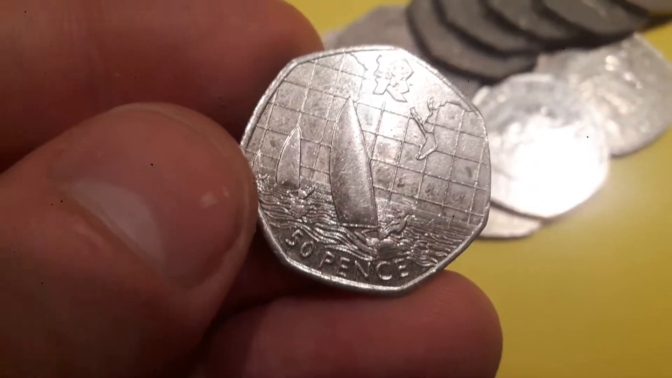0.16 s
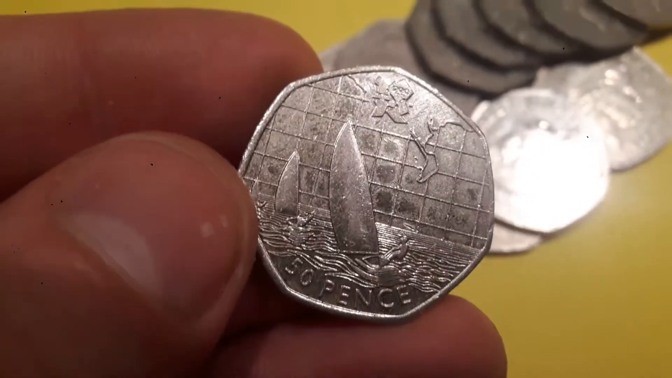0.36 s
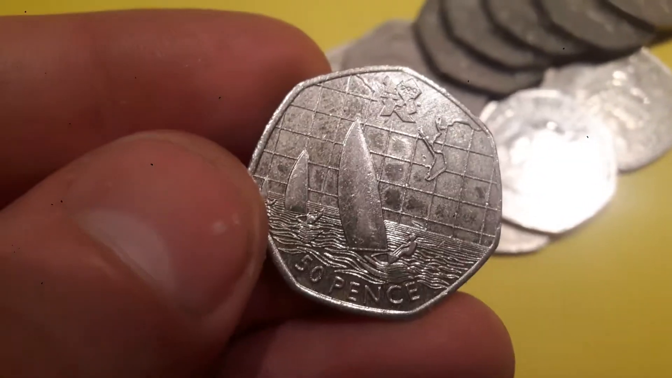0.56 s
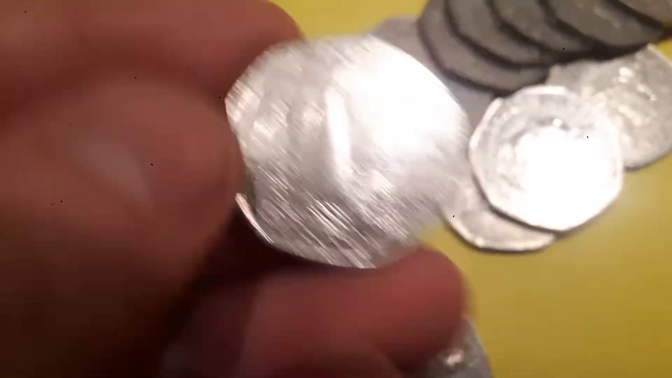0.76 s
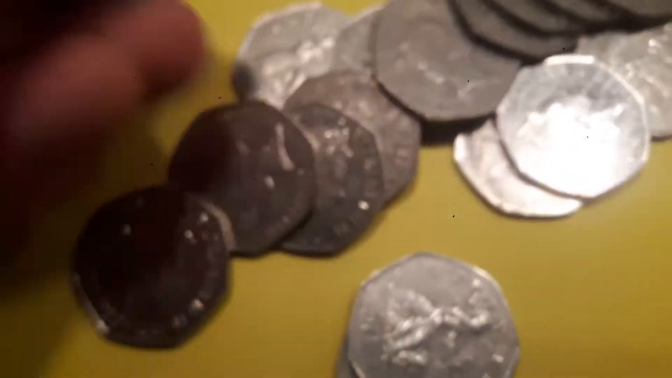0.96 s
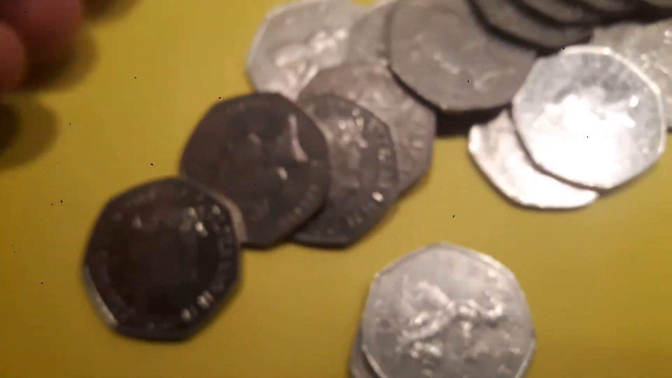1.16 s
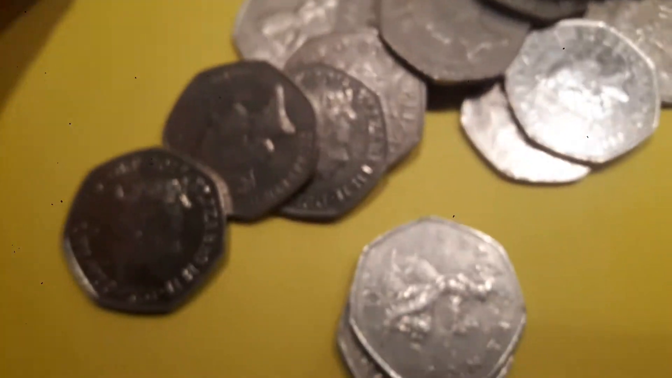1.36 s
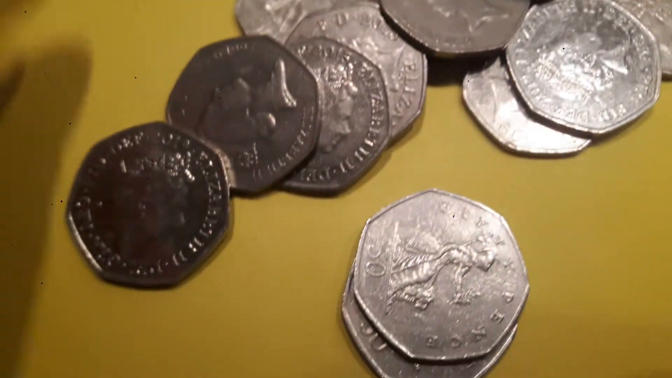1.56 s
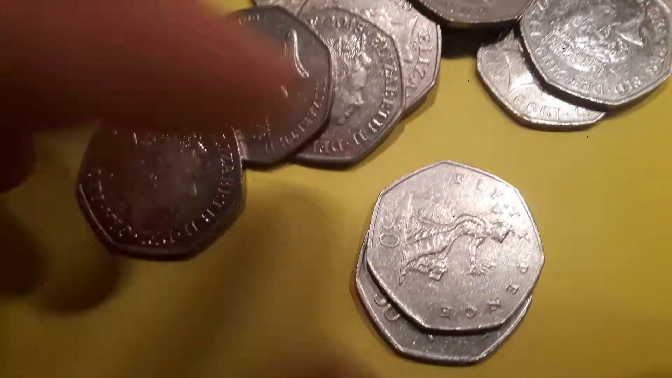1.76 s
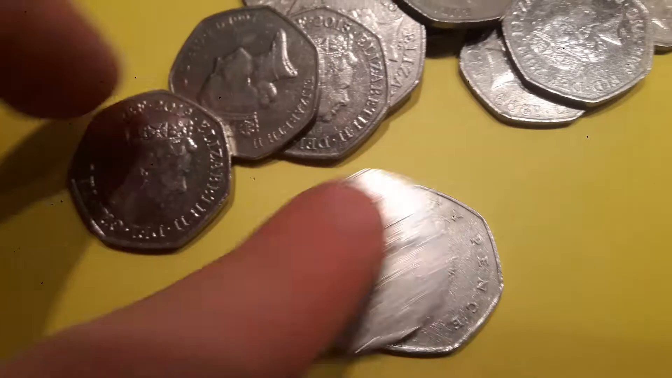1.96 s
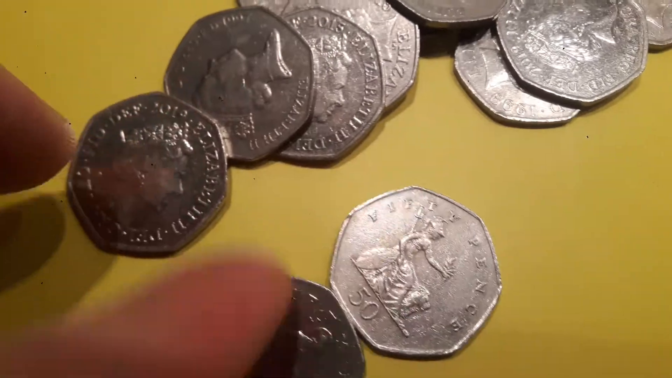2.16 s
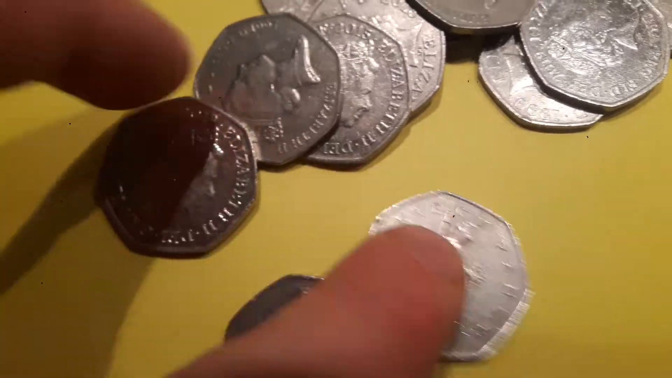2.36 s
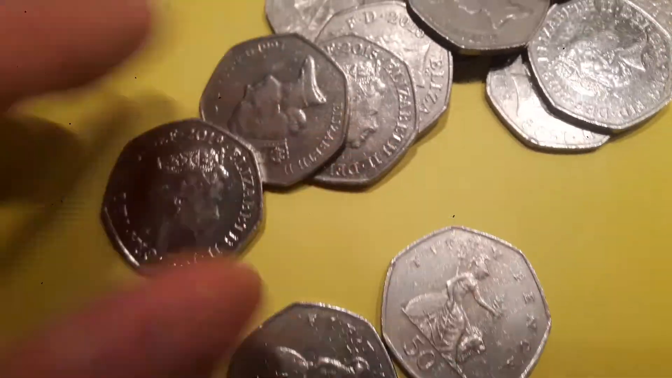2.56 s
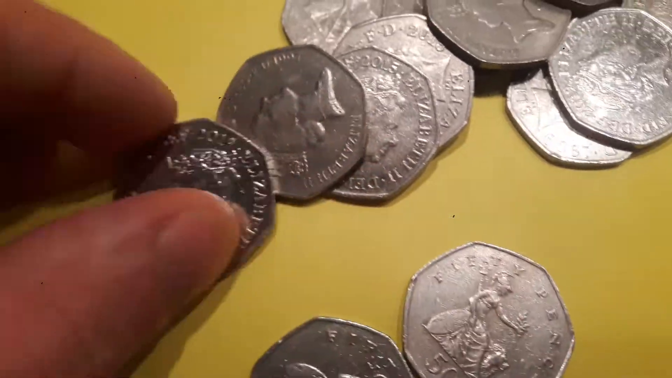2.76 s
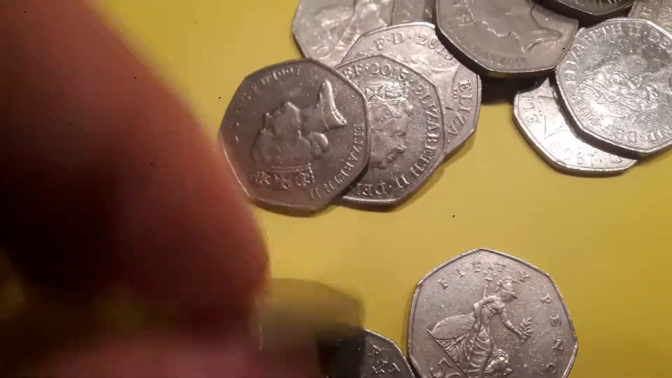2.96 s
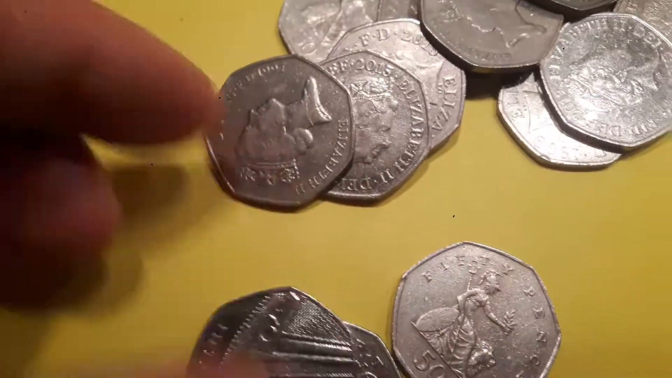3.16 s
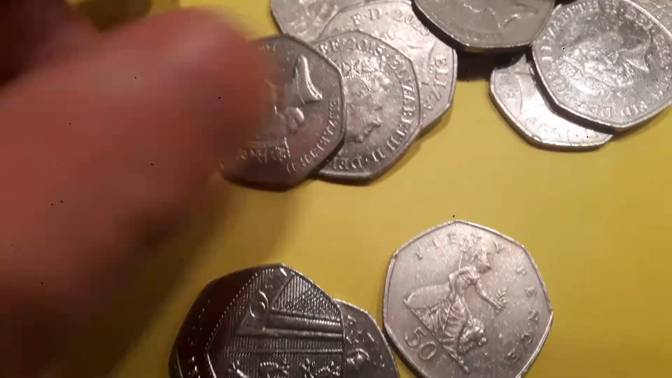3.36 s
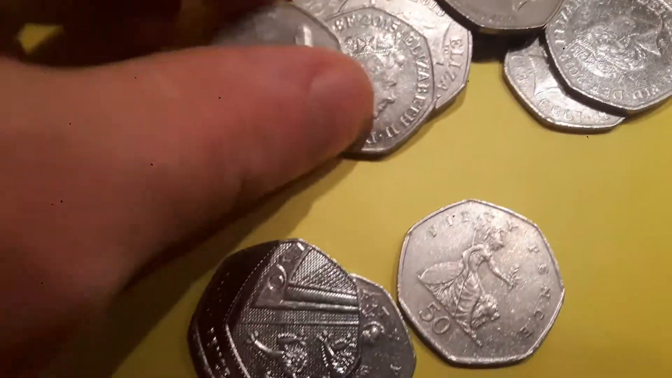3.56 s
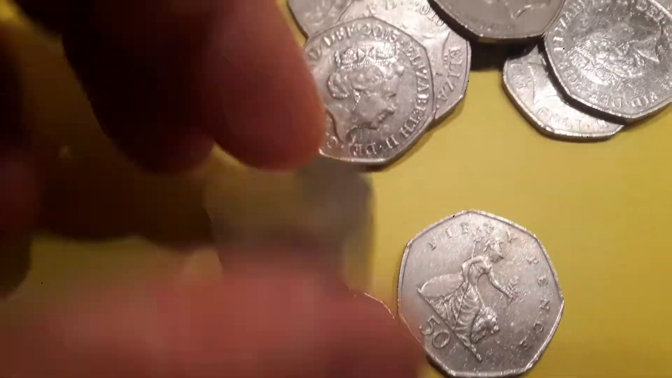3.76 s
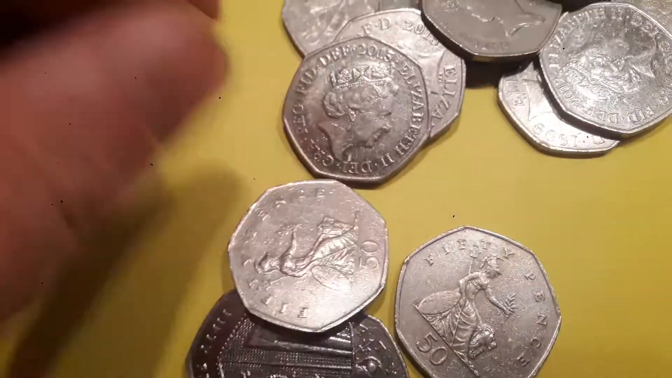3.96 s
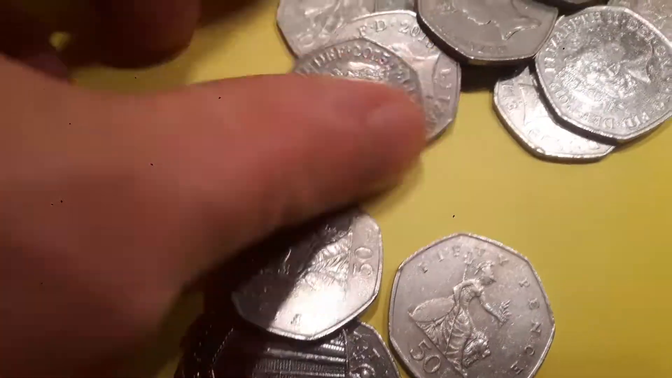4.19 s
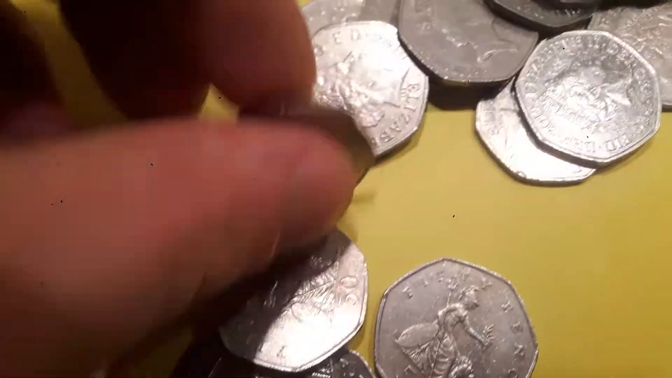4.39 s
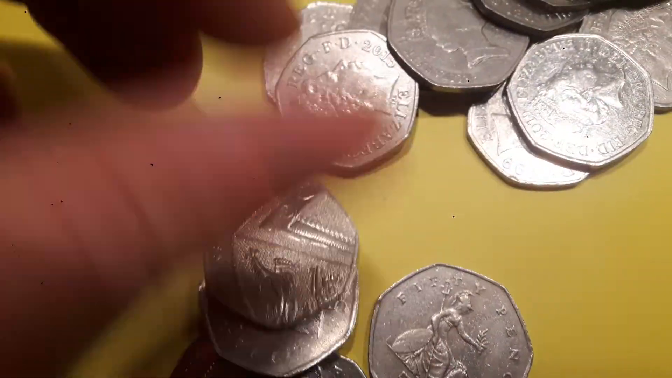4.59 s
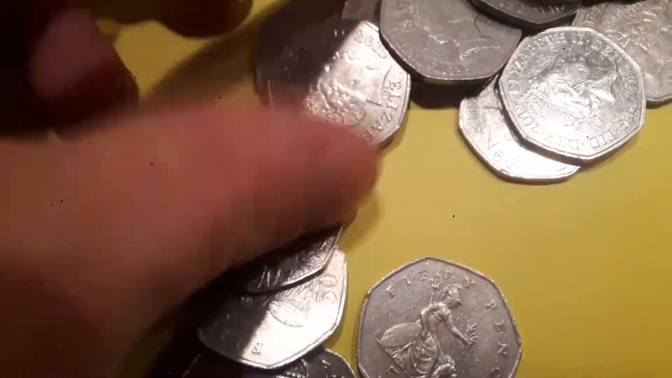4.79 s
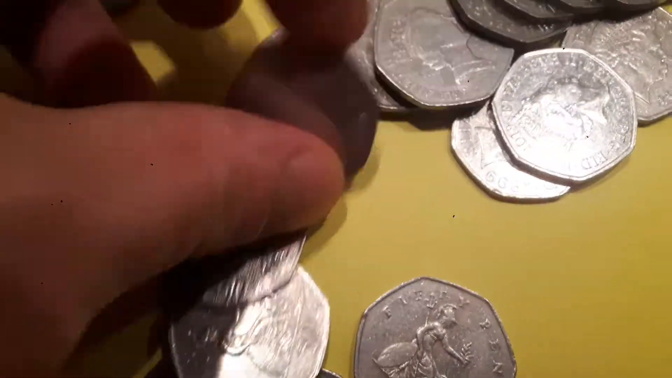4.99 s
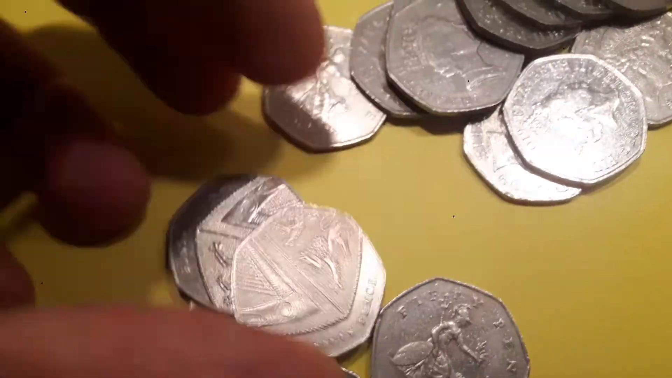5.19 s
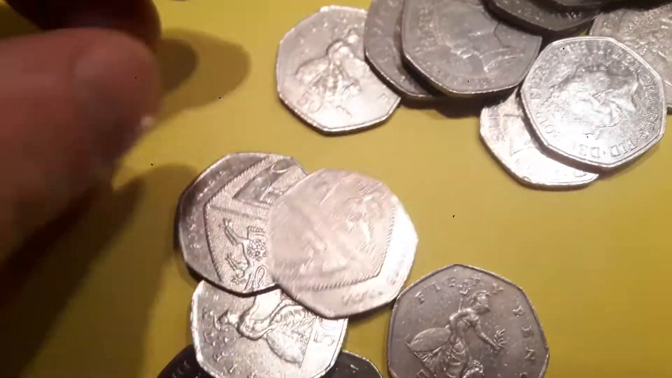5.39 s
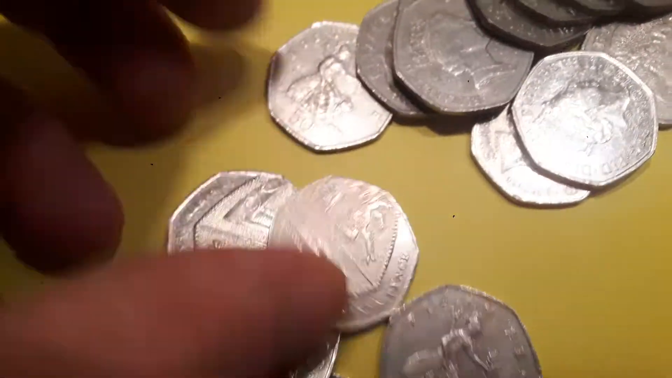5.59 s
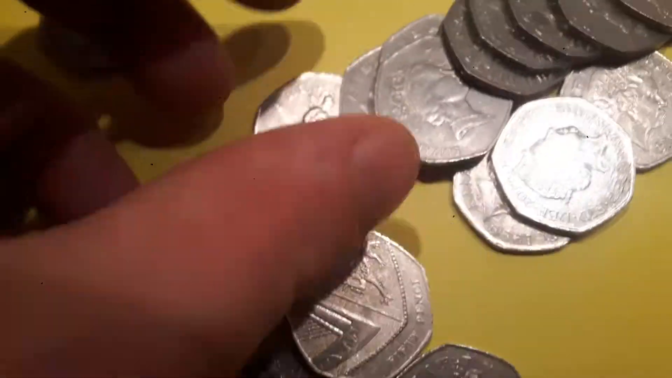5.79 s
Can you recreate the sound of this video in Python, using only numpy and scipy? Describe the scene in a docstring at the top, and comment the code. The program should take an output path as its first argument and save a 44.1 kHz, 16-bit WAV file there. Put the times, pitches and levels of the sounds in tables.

```python
"""A steady hiss and the faint rumble of fingers come first, then thuds on a wooden table and a low, hollow hum.
Coins are picked up and dropped on one another close to a small microphone: they tick, ring and slide.
Coins and wood are banks of decaying modes set off by blows and by showers of tiny collisions.
Fingers and dragged coins are shaped noise; a camera's focus motor buzzes as bursts of resonating clicks.
A quiet room adds a short tail to the coins and the table."""
import sys
import numpy as np
from scipy import signal
from scipy.fft import rfft, irfft
from scipy.io import wavfile

SR = 44100
rng = np.random.default_rng(int(sys.argv[2]) if len(sys.argv) > 2 else 0)


def invert_db(x):
    """Field ratio 10**(x/20) for x, a level in decibels (scalar or array-like)."""
    u = np.asarray(x, float) / 20
    return 10 ** u


def digitize_waveform(pressure):
    """Quantize a signal to 16-bit integers and store it at the path in sys.argv[1].

    Rows of a 2-D input are taken as channels; values are limited to [-1, 1].
    """
    field = np.atleast_2d(pressure).T
    bounded = np.clip(field, -1, 1)
    quanta = np.round(bounded * 32767).astype(np.int16)
    wavfile.write(sys.argv[1], SR, quanta)


N = 257544  # samples


def rms_one(x):
    """Normalisation: equal mean power, rms 1."""
    return x / np.sqrt(np.mean(x ** 2) + 1e-20)


def butter(x, order, hz, kind):
    """Butterworth filtering: a maximally flat passband."""
    return signal.sosfilt(signal.butter(order, hz, kind, fs=SR, output="sos"), x)


def drift(corner_hz):
    """Low-passed random fluctuation of rms 1, drawn 400 times a second and joined by straight lines."""
    draws = rng.standard_normal(int(N / SR * 400) + 2)
    memory = np.exp(-2 * np.pi * corner_hz / 400)
    slow = rms_one(signal.lfilter([1], [1, -memory], draws))
    return np.interp(np.arange(N) / SR * 400, np.arange(len(slow)), slow)


def coloured(spectrum):
    """Spectral shaping: white noise weighted along log frequency, rms 1."""
    hz, db = np.transpose(spectrum)
    grid = np.fft.rfftfreq(N, 1 / SR) + 1  # the added 1 Hz avoids log 0
    weight = invert_db(np.interp(np.log(grid), np.log(hz), db))
    return rms_one(irfft(rfft(rng.standard_normal(N)) * weight, N))


def strike(times, db, modes, spread_db, grains, tune):
    """Modal superposition: each blow excites every decaying mode with its own strength and phase."""
    at, out = (np.asarray(times) * SR).astype(int), np.zeros(N)
    luck = rng.standard_normal((len(at), len(modes)))
    phase = np.exp(2j * np.pi * rng.random((len(at), len(modes))))
    clock = np.cumsum(tune * np.ones(N)) / SR  # tune bends all pitches in time
    for k, (hz, level_db, t60) in enumerate(modes):
        # the same grains reach each mode three samples after the one before
        blows = np.roll(grains, 3 * k) + np.full(N, 1e-18 + 0j)
        np.add.at(blows, at, invert_db(db + spread_db * luck[:, k]) * phase[:, k])
        envelope = signal.lfilter([invert_db(level_db)], [1, -invert_db(-60 / (t60 * SR))], blows)
        out += np.real(envelope * np.exp(2j * np.pi * hz * clock))
    return out


def grit(per_s, spread_db, clump_db):
    """Clustered random impacts: tiny uneven collisions of random phase, rms 1; clumping varies their rate."""
    born = rng.random(N) < per_s * invert_db(clump_db * drift(40)) / SR
    sizes = invert_db(spread_db * np.minimum(rng.exponential(1, N), 4))
    impacts = born * sizes * np.exp(2j * np.pi * rng.random(N))
    return impacts / np.sqrt(np.mean(np.abs(impacts) ** 2))


def bursts(times, db, t60):
    """Exponential decay: a gain that rises with a 0.7 ms time constant at each moment and dies away."""
    jumps = np.full(N, 1e-18)
    np.add.at(jumps, (np.asarray(times) * SR).astype(int), invert_db(db))
    rise = np.exp(-1 / (0.0007 * SR))
    poles = np.convolve([1, -rise], [1, -invert_db(-60 / (t60 * SR))])
    return signal.lfilter([1 - rise], poles, jumps)


def swells(rows, rise, fall):
    """Exponential onset and decay (dB/s): full gain from a row's start for its length; one curve a level column."""
    t, out = np.arange(N) / SR, 0
    for start, length, *db in rows:
        shape = np.minimum(0, np.minimum(rise * (t - start), fall * (start + length - t)))
        out = out + invert_db(np.array(db))[:, None] * invert_db(np.maximum(shape, -200))
    return out


# Spectrum of room and microphone noise. Each row: frequency in Hz, relative level in dB per Hz.
HISS_SPECTRUM = [(15, -41), (25, 3), (33, -22.5), (65, 0), (259, -5), (538, -9.5), (584, -11), (787, -13),
                 (1470, -15.5), (1730, -20), (2040, -17.5), (2820, -19), (4360, -28), (15200, -34.5),
                 (16500, -33)]


def hiss():
    """Stationary noise: the steady floor of room and microphone, at -66.5 dB rms."""
    return invert_db(-66.5) * coloured(HISS_SPECTRUM)


def room(x):
    """Reverberation: convolution with exponentially decaying noise, duller than the direct sound."""
    t = np.arange(int(.4 * SR)) / SR
    t60_s, build_up_s = .3, 0.014
    tail = rng.standard_normal(len(t)) * invert_db(-60 * t / t60_s) * np.clip(t / build_up_s, 0, 1)
    tail = signal.lfilter([1], [1, -.7], tail)  # dulls the tail
    return signal.fftconvolve(x, tail / np.sqrt(np.sum(tail ** 2)))[:N]


# A low hollow hum, twice, perhaps a phone's vibration motor.
# Each row: start in seconds, length in seconds, level in dB.
HUMS = [(0.885, 0.062, -49), (1.05, 0.015, -51)]


def hum():
    """Frequency and amplitude modulation: a low sine near 224.5 Hz that wavers in pitch and level."""
    level, = swells(HUMS, rise=1500., fall=207)
    hz = 224.5 * invert_db(0.034 * drift(12.))
    tone = np.sqrt(2) * np.sin(2 * np.pi * np.cumsum(hz) / SR)  # rms 1
    return level * invert_db(1.8 * drift(25.)) * tone


# Moments of the motor steps within a burst. Each entry: a count of step periods from the burst's start.
FOCUS_STEPS = [0, 2, 4, 5, 7, 9]
# Resonances of the camera shell. Each row: frequency in Hz, relative level in dB, t60 in seconds.
SHELL_MODES = [(253, -7.5, 0.0083), (1660, 1.5, 0.0012), (2630, -9.5, 0.0096), (3930, -45, 0.0014),
               (5850, -13, 0.0012)]


def focus_motor():
    """Source and resonator: motor steps of changing direction click into the modes of the camera shell."""
    start_s, burst_period_s, step_s, burst_count = 1.4104, 1 / 30, 1 / 1047, 11
    click_db, end_bursts_db = -42.5, -7.5  # the first and last bursts are weaker
    clicks, out = np.full(N, 1e-18), np.zeros(N)
    for k in range(burst_count):
        db = click_db + end_bursts_db * (k in (0, burst_count - 1))
        at = (start_s + k * burst_period_s + step_s * np.array(FOCUS_STEPS)) * SR
        clicks[at.astype(int)] = invert_db(db) * np.array([1, -1, 1, 1, -1, 1])
    for hz, level_db, t60 in SHELL_MODES:
        r, w = invert_db(-60 / (t60 * SR)), 2 * np.pi * hz / SR
        out += signal.lfilter([0, invert_db(level_db) * np.sin(w)], [1, -2 * r * np.cos(w), r * r], clicks)
    out = butter(out, 2, [4600., 5300.], "bandstop")  # a gap between shell resonances
    return butter(out, 8, 7600., "low")  # the shell passes almost nothing of the top octave


# Fingers moving on the table; the longest row is the resting hand.
# Each row: start in seconds, length in seconds, rumble level in dB, rub level in dB, both before wavering.
FINGER_MOVES = [(0, 0.89, -71.5, -79), (1.0, 4.5, -68, -74.5), (1.44, 0.036, -50.5, -58),
                (1.97, .17, -73, -63), (2.49, 0.0033, -51, -74), (2.79, 0.0068, -54.5, -73),
                (3.19, 0.04, -46, -58), (3.3, 0.14, -74.5, -89.5), (3.64, 0.046, -59.5, -71),
                (3.76, 0.034, -55.5, -87.5), (3.89, 0.051, -49, -55.5), (4.0, 0.017, -70.5, -78),
                (4.31, 0.033, -50.5, -63), (4.63, 0.018, -41, -55), (4.75, .1, -63.5, -75),
                (4.9, 0.058, -56.5, -60.5), (5.1, 0.19, -56, -72.5), (5.29, 0.034, -49.5, -53),
                (5.71, 0.059, -55, -67.5)]
# Spectrum of the rumble. Each row: frequency in Hz, relative level in dB per Hz.
RUMBLE_SPECTRUM = [(25, -45.5), (85, 3), (125, 1), (180, 2.5), (260, -14.5), (350, -15), (430, -15),
                   (1200, -36.5), (2500, -58)]
# Spectrum of the rub. Each row: frequency in Hz, relative level in dB per Hz.
RUB_SPECTRUM = [(300, -3), (600, 3.5), (1100, -3), (2200, -9), (4000, -13.5), (8000, -46)]


def fingers():
    """Friction noise: moving fingers give a deep rumble and a brighter rub; also returns the rub's gain."""
    rumble, rub = swells(FINGER_MOVES, rise=414.5, fall=203.5)
    deep = rumble * invert_db(3.44 * drift(11.0)) * coloured(RUMBLE_SPECTRUM)
    skin = rub * invert_db(4.9 * drift(5.0)) * coloured(RUB_SPECTRUM)
    return deep + skin, rub


# Coins dragged over the table. Each row: start in seconds, length in seconds, level in dB.
DRAGS = [(1.44, .06, -49.5), (2.0, 0.073, -54.5), (4.3, 0.068, -55.5), (4.92, 0.062, -56), (5.2, 0.13, -53)]


def drone():
    """Resonance under friction: dragged coins make one wood mode drone, a narrow band of noise."""
    centre_hz, width_hz = 368.3, 28.6
    edges = [centre_hz - width_hz / 2, centre_hz + width_hz / 2]
    band = rms_one(butter(rng.standard_normal(N), 2, edges, "band"))
    return band * swells(DRAGS, rise=414.5, fall=414.5)[0]


# Blows on the table. Each row: time in seconds, deep part in dB, sharp part in dB, both before the modes.
THUDS = [(0.878, -43.5, -73), (0.921, -49, -92), (1.016, -41.5, -85), (1.045, -36, -48), (1.167, -51, -67),
         (1.319, -48.5, -63), (1.427, -32, -36.5), (1.46, -50, -51.5), (1.51, -49, -69),
         (1.958, -35.5, -55.5), (2.023, -47, -56), (2.04, -41, -78), (2.091, -43.5, -61), (2.156, -47, -78),
         (2.449, -49.5, -86), (2.481, -41, -72), (2.763, -47.5, -80), (2.793, -52, -81),
         (3.175, -30, -37.5), (3.22, -32, -48.5), (3.249, -41, -64), (3.746, -50.5, -81), (3.787, -49, -80),
         (3.828, -41.5, -64), (3.879, -28.5, -39.5), (3.903, -34, -46), (3.93, -38.5, -48.5),
         (4.006, -64, -62), (4.279, -42, -59), (4.306, -49, -61), (4.56, -39.5, -56), (4.614, -32.5, -42.5),
         (4.654, -39, -51.5), (4.829, -50, -80), (4.896, -44.5, -52), (4.941, -60, -57.5),
         (5.064, -46.5, -62.5), (5.115, -55, -78), (5.187, -32, -53.5), (5.232, -40, -60),
         (5.282, -31.5, -46), (5.291, -33.5, -47), (5.296, -37.5, -53.5), (5.334, -36.5, -57),
         (5.677, -47, -79)]
# Deep modes of the wood. Each row: frequency in Hz before drift, relative level in dB, t60 in seconds.
WOOD_LOW = [(94.55, -1, 0.044), (128.2, 0.5, 0.013), (178, 0.5, 0.022), (242.6, -11, 0.038),
            (343.2, -1.5, 0.058), (421, -6, 0.022), (555.6, -11.5, 0.086)]
# Sharp modes of the wood. Each row: frequency in Hz, relative level in dB, t60 in seconds.
WOOD_HIGH = [(763, -5.5, 0.024), (1063, 2, 0.021), (1420, -12, 0.072), (1974, -4, 0.0088),
             (2265, -5.5, 0.017), (2915, -11.5, 0.011), (4630, -45, 0.0029)]


def thuds(rub):
    """Impact excitation of a plate: blows ring the wood and crack; stick and slip of skin feeds the deep modes."""
    s, deep_db, sharp_db = np.transpose(THUDS)
    stick_slip = invert_db(-17.5) * rub * grit(400., spread_db=1.0, clump_db=3.0)
    wander = invert_db(0.2007 * drift(3.71))
    low = strike(s, deep_db, WOOD_LOW, spread_db=3.0, grains=stick_slip, tune=wander)
    low = butter(low, 3, [90., 1500.], "band")  # soft contact rounds the low modes
    spray = grit(3000., spread_db=4.0, clump_db=-2.5) * bursts(s, sharp_db - 16.5, 0.05)
    high = strike(s, sharp_db, WOOD_HIGH, spread_db=4.5, grains=spray, tune=1)
    dry_noise = rms_one(butter(rng.standard_normal(N), 2, 2500, "low"))
    crack = bursts(s, sharp_db + 9, .008) * dry_noise
    return low + butter(high + crack, 2, [400., 6000.], "band")


def table():
    """Superposition: blows, finger friction and drone add up on the one wooden table."""
    friction, rub = fingers()
    return thuds(rub) + drone() + friction


# The coin touches that stand out.
# Each row: time in seconds, bright part in dB, dull part in dB, ring in dB, all before the modes.
TOUCHES = [(1.4271, -57, -43.5, -72), (1.959, -45.5, -45.5, -58.5), (1.975, -51, -55, -62),
           (1.988, -44.5, -43, -48), (2.0109, -49, -42.5, -62), (2.022, -29, -36.5, -42),
           (2.0398, -35, -37, -39), (2.0541, -30.5, -32, -52), (2.094, -37, -34, -52),
           (2.1206, -46, -42, -55), (2.1624, -57, -42, -46), (2.1855, -61, -45.5, -58),
           (2.2173, -64, -55, -63), (2.4552, -66, -54, -56), (2.482, -80, -50.5, -82),
           (2.4945, -63, -52, -62), (2.7781, -61, -62, -68), (2.796, -63, -62, -75),
           (3.1637, -50.5, -53, -48.5), (3.1739, -32.5, -36.5, -31), (3.2235, -31, -41, -32),
           (3.243, -33, -45, -31), (3.2494, -33, -45.5, -30), (3.584, -61.5, -63, -67),
           (3.629, -59.5, -63, -71), (3.638, -58, -65, -70), (3.703, -61.5, -71, -78),
           (3.729, -63, -70, -66), (3.8288, -64, -57, -80), (3.8367, -57, -54.5, -47),
           (3.8794, -31, -30.5, -24.5), (3.905, -48, -66, -42), (3.923, -29, -40, -27.5),
           (3.945, -35.5, -44, -45), (4.0072, -46, -61, -42), (4.0123, -39, -62, -32),
           (4.1068, -55, -60.5, -53.5), (4.28, -48, -54, -58), (4.2986, -40.5, -50, -48),
           (4.3096, -51, -52, -52), (4.3319, -45, -47, -47), (4.413, -59.5, -55.5, -68),
           (4.4308, -86, -62, -63), (4.4556, -72, -64, -69), (4.5572, -64, -58.5, -63),
           (4.6121, -25.5, -36, -29), (4.657, -32, -40.5, -52), (4.6722, -38, -51, -30),
           (4.6938, -38.5, -47, -39.5), (4.721, -39, -50, -52), (4.7512, -53, -56, -46),
           (4.759, -44, -53, -46), (4.8462, -56, -57, -51.5), (4.902, -38, -42, -34),
           (4.923, -51, -56, -48), (4.9377, -46, -41, -45), (4.989, -56, -54, -60), (5.0521, -54, -52, -60),
           (5.0667, -37, -43.5, -38), (5.077, -46, -53, -51), (5.1494, -70, -56, -49),
           (5.186, -69, -54, -42.5), (5.2508, -38, -45.5, -29), (5.262, -33, -48, -33),
           (5.2775, -30, -49, -34), (5.2862, -26, -47, -22.5), (5.33, -25, -40, -28.5),
           (5.3467, -31, -58, -37), (5.3664, -36, -46, -47), (5.493, -55, -58.5, -59),
           (5.587, -60.5, -64.5, -63), (5.6805, -51.5, -58, -53), (5.723, -59, -56, -51),
           (5.802, -56, -57, -47)]
# Short dull resonances of coins damped by fingers and neighbours.
# Each row: frequency in Hz before drift, relative level in dB, t60 in seconds.
DULL_MODES = [(3460, -5, 0.011), (4126, -2, 0.016), (5464, -4, 0.016), (5810, 2, 0.0019)]
# Short bright resonances of the same damped coins.
# Each row: frequency in Hz before drift, relative level in dB, t60 in seconds.
BRIGHT_MODES = [(7380, -10, 0.0047), (9380, -13, 0.014), (9590, -6.5, 0.0034), (10550, -7.5, 0.0064),
                (11540, -17.5, 0.0072), (12000, -9.5, 0.012), (13600, -2, 0.004), (15500, -30.5, 0.0064)]


def coin_ticks(spray, chatter, scrape):
    """Damped modal response: touches, their spray and scraping excite short resonances of held coins."""
    s, bright_db, dull_db, _ = np.transpose(TOUCHES)
    bright_grains = spray * bursts(s, bright_db - 10.5, 0.028) + invert_db(-22.5) * scrape * chatter
    dull_grains = spray * bursts(s, dull_db - 23, 0.039) + invert_db(-29.5) * scrape * chatter
    bright_tune = invert_db(0.36 * drift(20.))
    dull_tune = invert_db(.3 * drift(6.))  # the grip shifts these
    bright = strike(s, bright_db, BRIGHT_MODES, spread_db=-1.5, grains=bright_grains, tune=bright_tune)
    dull = strike(s, dull_db, DULL_MODES, spread_db=2.5, grains=dull_grains, tune=dull_tune)
    return bright + dull


# Each coin is worn to its own pitch.
# Each row: from time in seconds, low ring in Hz, high ring in Hz.
IN_HAND = [(0, 8650, 14950), (3.1, 8730, 14600), (3.5, 8640, 14760), (4.199, 8800, 15000),
           (4.582, 8730, 14650), (4.88, 8710, 14930), (5.2, 8700, 14800), (5.601, 8660, 14950)]
# Balance of each coin in turn. Each entry: low ring against high ring in dB.
GRIP_DB = [-14, -8, -14.5, -9.5, -12, -14.5, -11.5, -15.5]
# Damped modes of a coin that rings at 8740 and 14700 Hz, low group; close pairs beat.
# Each row: frequency in Hz before tuning, relative level in dB, t60 in seconds.
LOW_RING = [(8520, -2, 0.0082), (8700, 7, .025), (8880, -3, 0.012), (9150, -24, 0.05)]
# The high group of that coin. Each row: frequency in Hz before tuning, relative level in dB, t60 in seconds.
HIGH_RING = [(14540, -5, .014), (14700, 0, .02), (14850, -4, .014), (15080, -10, .01), (14730, -36, .06)]
# A dropped coin rocks freely and rings on until it lies flat.
# Each row: start in seconds, length in seconds, free ring against damped ring in dB.
ROCKING = [(3.173, 0.075, -3.5), (3.878, 0.046, 3.5), (4.01, 0.013, -20), (4.612, 0.078, -4.5),
           (4.897, 0.067, -20), (5.248, .025, -8), (5.276, .03, -0.5), (5.325, 0.037, -18)]
# Free low modes. Each row: frequency in Hz before tuning, relative level in dB, t60 in seconds.
FREE_LOW = [(8690, 0, .07), (8790, -3, .06)]
# Free high modes. Each row: frequency in Hz before tuning, relative level in dB, t60 in seconds.
FREE_HIGH = [(14660, 0, .09), (14780, -6, .06)]


def coin_rings(spray, chatter, jingle):
    """Free and damped vibration: each coin rings at its own pitch, and longer while it rocks freely."""
    s, _, _, ring_db = np.transpose(TOUCHES)
    start, low_hz, high_hz = np.transpose(IN_HAND)
    held = np.maximum(np.searchsorted(start, np.arange(N) / SR) - 1, 0)  # which coin sounds
    grains = spray * bursts(s, ring_db - 25, 0.07) + invert_db(-17.0) * jingle * chatter
    free_gain, = swells(ROCKING, rise=5004, fall=1199)

    def ring(damped_modes, free_modes, tune):
        """Superposition of a damped bank and a gated free bank of modes."""
        damped = strike(s, ring_db, damped_modes, spread_db=3, grains=grains, tune=tune)
        free = strike(s, ring_db, free_modes, spread_db=3, grains=grains, tune=tune)
        return damped + free_gain * free

    low = ring(LOW_RING, FREE_LOW, low_hz[held] / 8740)
    high = ring(HIGH_RING, FREE_HIGH, high_hz[held] / 14700)
    return low * invert_db(np.array(GRIP_DB))[held] + high


# Coins sliding over one another. Each row: start in seconds, length in seconds,
# scrape in dB, jingle in dB, both before the gains that feed the modes.
SLIDES = [(1.963, 0.051, -70, -74), (2.032, 0.04, -42, -54), (2.097, 0.065, -42, -64),
          (2.18, .02, -60, -72), (2.457, 0.016, -61, -76), (3.168, 0.036, -61, -39.5),
          (3.7, 0.057, -66, -82), (3.883, 0.05, -44, -37), (3.93, 0.045, -57, -55),
          (4.005, 0.0064, -45, -58), (4.284, 0.029, -59, -71), (4.34, 0.19, -67.5, -86),
          (4.617, 0.053, -45, -42), (4.695, .04, -50.5, -51), (4.755, 0.043, -57, -71),
          (4.898, 0.049, -40.5, -46), (5.02, 0.067, -49, -66), (5.1, 0.13, -61.5, -68),
          (5.254, 0.023, -44.5, -44), (5.278, 0.031, -44, -35.5), (5.322, 0.038, -41, -36),
          (5.385, 0.051, -54, -81), (5.685, 0.042, -45, -62), (5.745, .1, -58, -66)]


def coins():
    """Collision cascades: touches spray tiny impacts, and sliding adds chatter with snags of the rims."""
    scrape, jingle = swells(SLIDES, rise=5004, fall=837)
    spray = grit(5000., spread_db=7.5, clump_db=0.5)
    chatter = grit(4500., spread_db=4.0, clump_db=1.5)
    snags = invert_db(-3.5) * grit(52, spread_db=2.0, clump_db=4.0)  # rims catch now and then
    chatter = chatter + snags
    sound = coin_ticks(spray, chatter, scrape) + coin_rings(spray, chatter, jingle)
    return butter(sound, 2, 900., "high")  # little of the coins sounds below about 900 Hz


def scene():
    """Direct and reverberant sound: coins and table with their room, then hum, motor and hiss without it."""
    near = coins() + table()
    mix = near + invert_db(-23) * room(near) + hum() + focus_motor() + hiss()
    return mix[None]


def band_limit(x):
    """A steep low-pass at the top of the band."""
    return signal.sosfilt(signal.butter(12, 16810, fs=SR, output="sos"), x)


def record(dry):
    """Band limiting and saturation: lost deep bass, rounded peaks, a steep top cut and a small offset."""
    thin = butter(dry, 2, 45, "high")  # the small microphone drops the deepest bass
    rounded = .22 * np.tanh(thin / .22)
    cut = signal.sosfilt(signal.cheby2(14, 30, 16200, fs=SR, output="sos"), rounded)
    mix = cut - .0005  # the converter's offset
    return band_limit(mix)


dry = scene()
out = record(dry)
digitize_waveform(out)
```